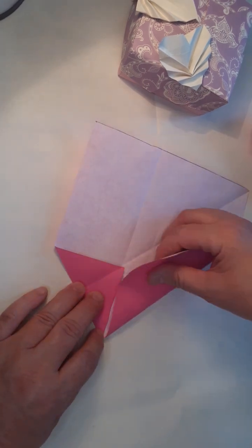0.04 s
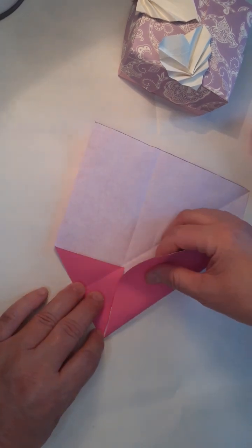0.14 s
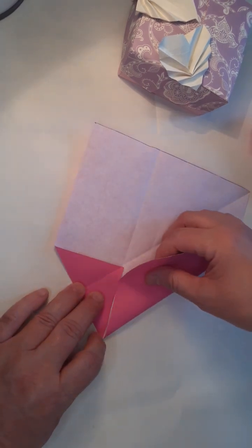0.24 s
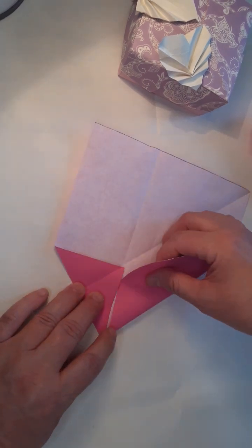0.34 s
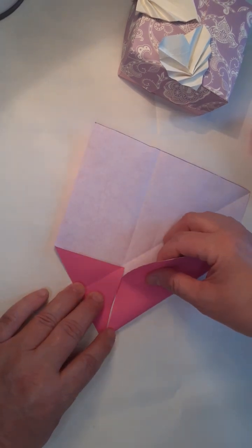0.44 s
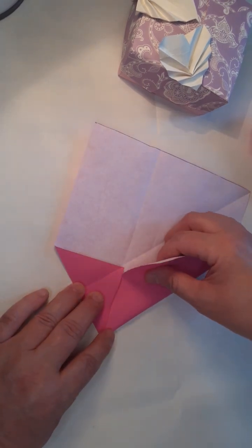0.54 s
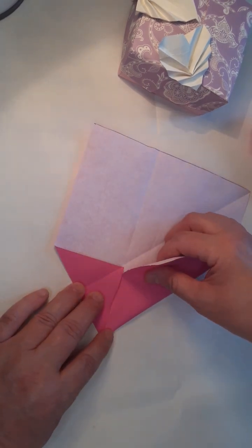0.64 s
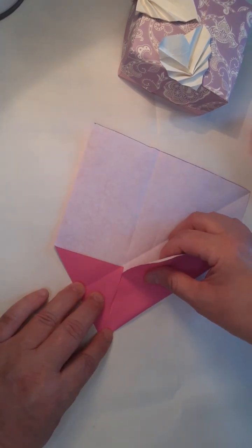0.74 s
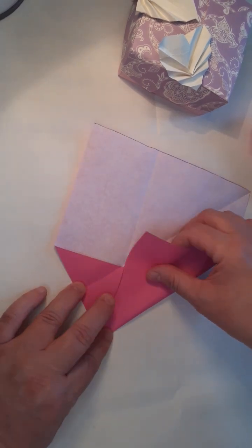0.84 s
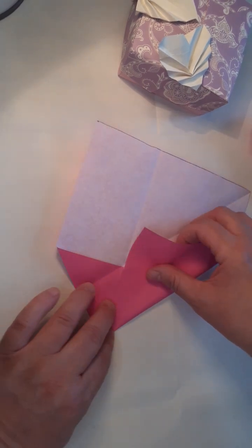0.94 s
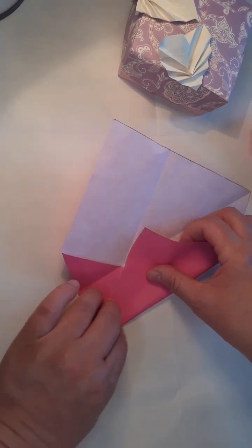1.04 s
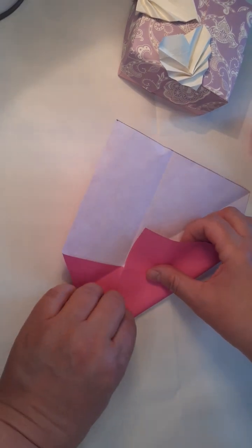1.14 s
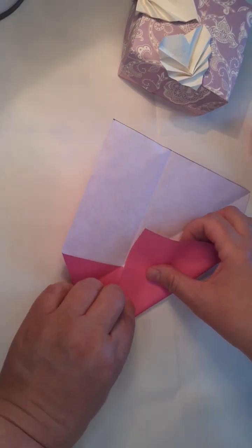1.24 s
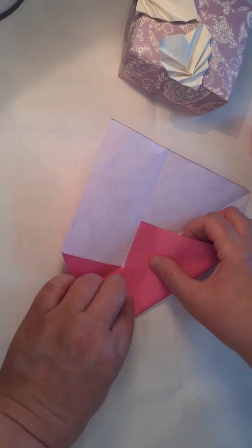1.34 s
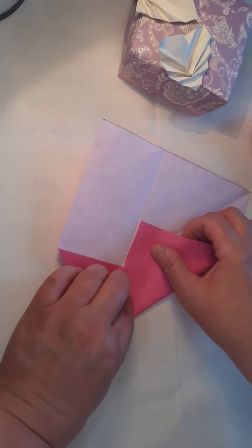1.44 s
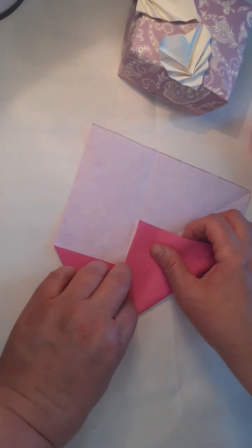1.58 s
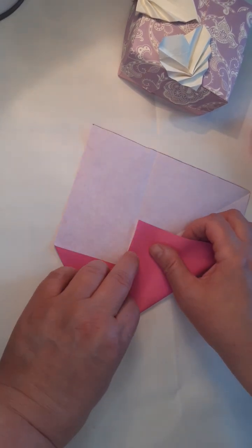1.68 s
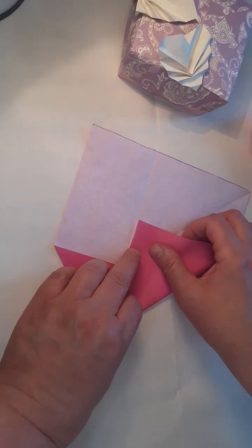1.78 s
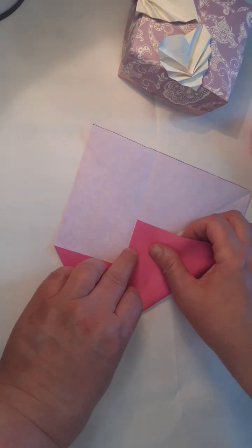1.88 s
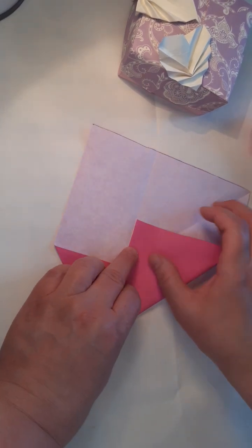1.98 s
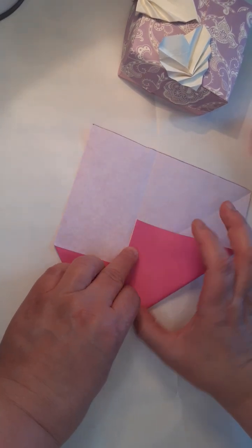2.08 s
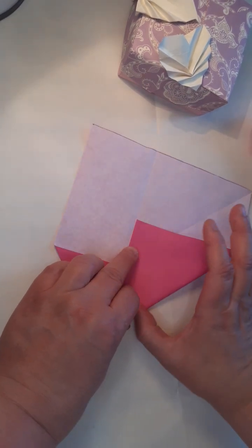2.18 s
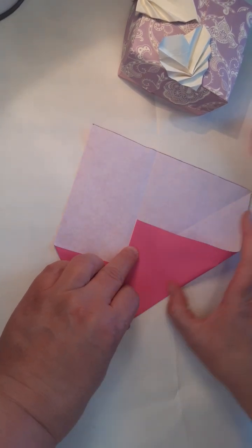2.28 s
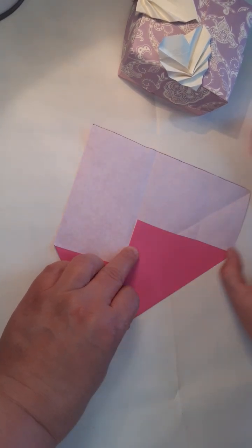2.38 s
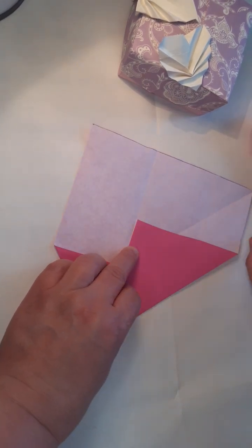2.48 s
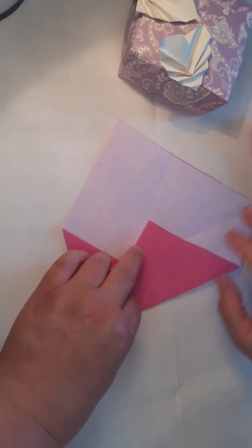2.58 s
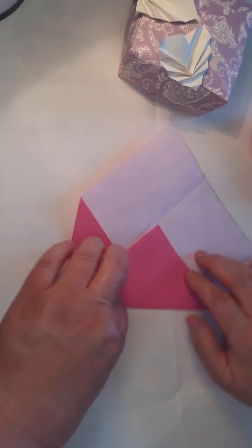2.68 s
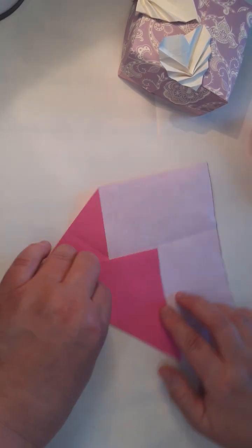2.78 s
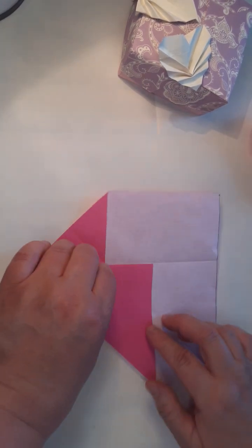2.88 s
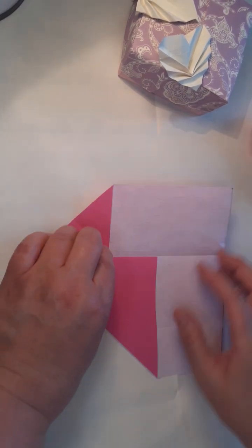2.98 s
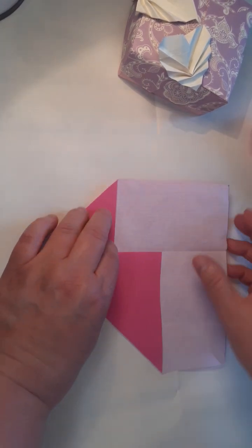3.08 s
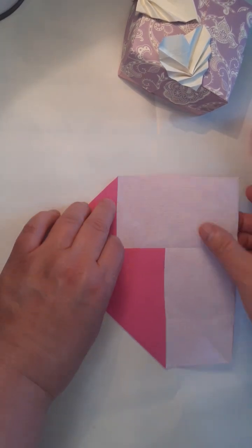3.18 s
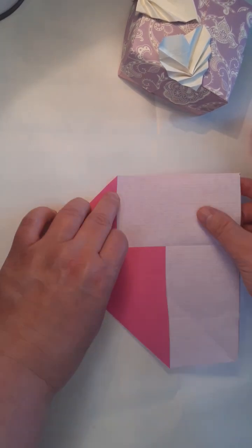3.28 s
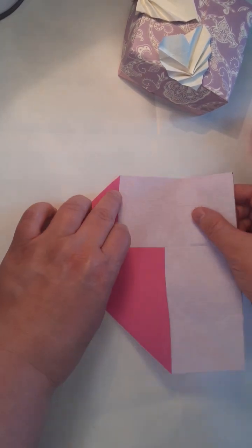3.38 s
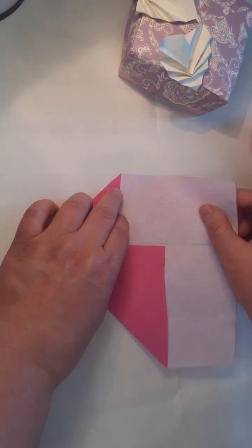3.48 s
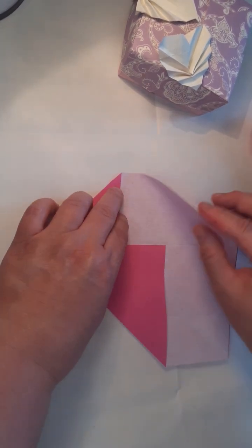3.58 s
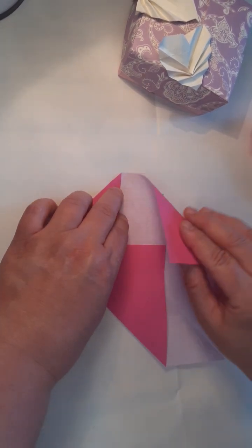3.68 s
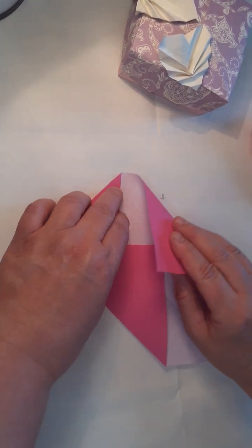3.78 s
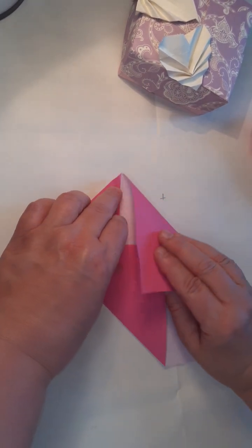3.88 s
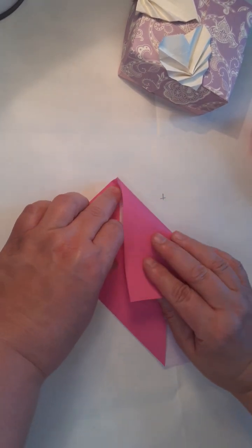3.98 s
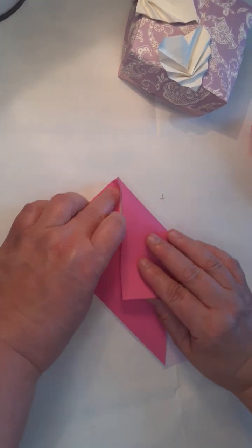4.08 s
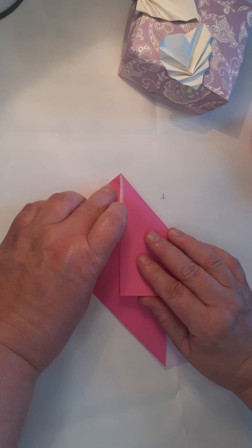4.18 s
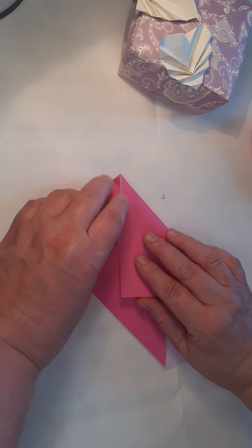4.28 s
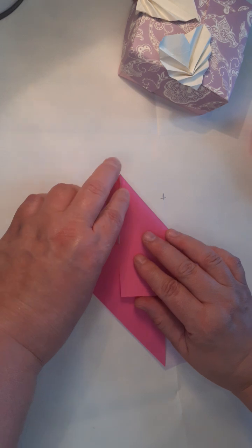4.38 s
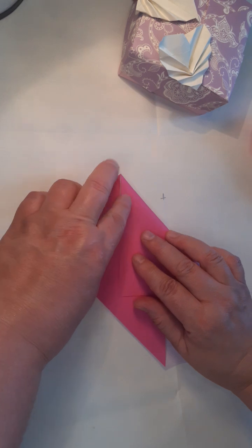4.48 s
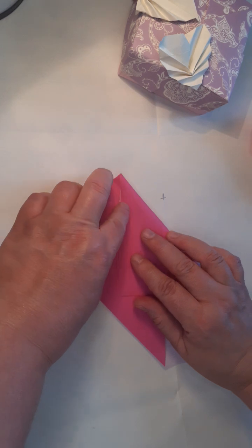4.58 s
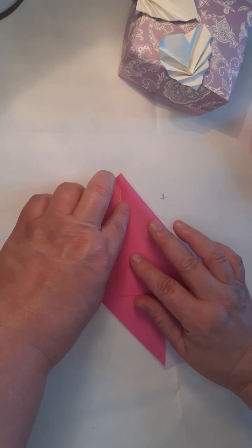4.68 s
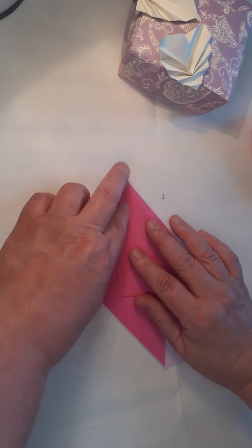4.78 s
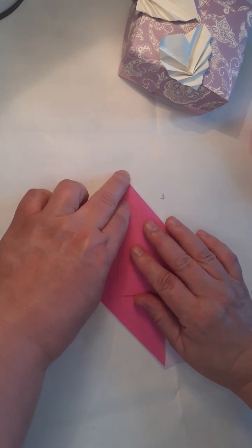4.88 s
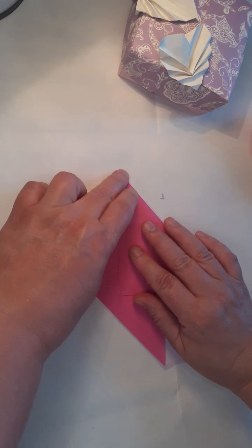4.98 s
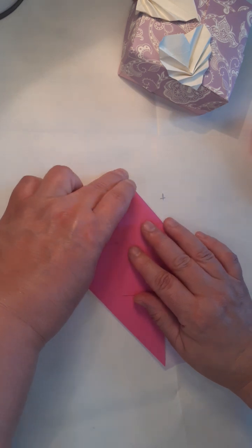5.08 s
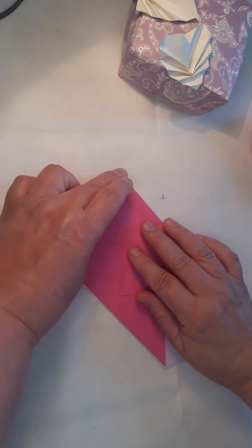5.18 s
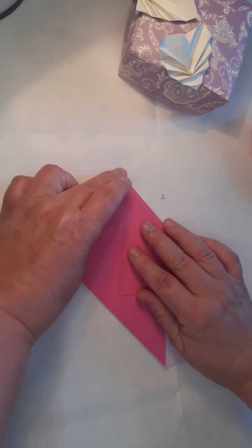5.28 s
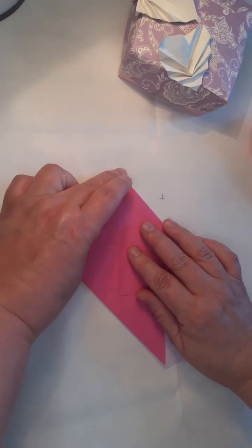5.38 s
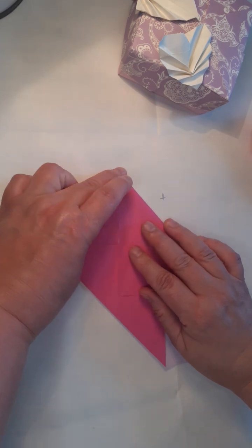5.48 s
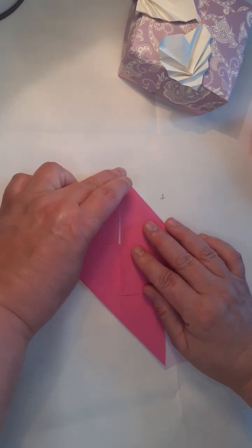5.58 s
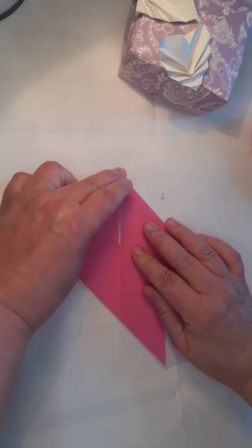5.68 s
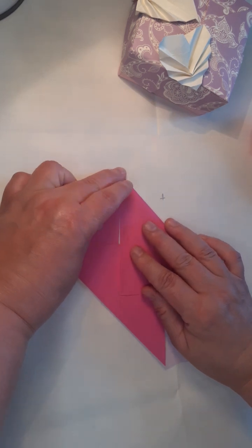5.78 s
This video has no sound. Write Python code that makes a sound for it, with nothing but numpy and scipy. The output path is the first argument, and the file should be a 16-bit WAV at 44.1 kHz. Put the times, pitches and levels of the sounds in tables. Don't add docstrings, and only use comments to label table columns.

```python
import sys
import numpy as np
from scipy import signal
from scipy.fft import rfft, irfft
from scipy.io import wavfile

SR = 44100
rng = np.random.default_rng(int(sys.argv[2]) if len(sys.argv) > 2 else 0)


def voltage_ratio(decibels):
    exponent = np.asarray(decibels, float) / 20
    return 10 ** exponent


def to_wav(sig):
    pcm = np.clip(np.atleast_2d(sig), -1, 1) * 32767
    pcm = np.round(pcm).astype(np.int16)
    wavfile.write(sys.argv[1], SR, pcm.T)


N = 257569

SNAP_LAG_SAMPLES, SLIDE_LAG_SAMPLES = 5.44, 2.82


def band(x, low_hz, high_hz, order=2):
    return signal.sosfilt(signal.butter(order, [low_hz, high_hz], "band", fs=SR, output="sos"), x)


def rms_one(x):
    return x / np.sqrt(np.mean(x ** 2) + 1e-20)


def peak_one(x):
    return x / np.abs(x).max(axis=1, keepdims=True)


def power_sum(*levels_db):
    return 10 * np.log10(sum(voltage_ratio(2 * db) for db in levels_db) + 1e-14)


def in_time(rows):
    s, *columns = np.transpose(rows)
    return [np.interp(np.arange(N) / SR, s, c) for c in columns]


def at_hz(points, hz):
    points = np.array(points)
    return np.interp(np.log(hz), np.log(points[:, 0]), points[:, 1])


def drift(rate_hz):
    r = np.exp(-40 * np.pi * rate_hz / SR)
    slow = signal.lfilter([1], [1, -2 * r, r * r], rng.standard_normal(N // 20 + 2002))[2000:]
    return np.interp(np.arange(N) / 20, np.arange(len(slow)), rms_one(slow))


def resonance(x, hz, width_hz):
    r = np.exp(-np.pi * width_hz / SR)
    poles = [1, -2 * r * np.cos(2 * np.pi * hz / SR), r * r]
    return signal.lfilter([(1 - r * r) / 2, 0, (r * r - 1) / 2], poles, x)


def pair(mid, side, alike):
    alike = np.clip(alike, 0, 1)
    both = np.sqrt(1 + alike) * mid + np.sqrt(1 - alike) * side * [[1], [-1]]
    return both / np.sqrt(1 + alike)


def place(x, pan_db, lag_samples):
    delay = np.exp(-2j * np.pi * np.fft.rfftfreq(x.shape[1]) * lag_samples)
    late = np.array([x[0], irfft(rfft(x[1]) * delay, x.shape[1])])
    return late * voltage_ratio(np.array([pan_db / 2, -pan_db / 2]).reshape(2, -1))


# (frequency [Hz], density [dB per Hz])
FLOOR_SPECTRUM = [(18, -54.5), (30, -20), (106, 2), (252, 2), (345, -3.5), (486, -18.5), (584, -12.5),
                  (1100, -18), (4300, -26), (8740, -24), (16000, -13)]


def floor():
    hz = np.maximum(np.fft.rfftfreq(N, 1 / SR), 20)
    noise = irfft(rfft(rng.standard_normal((2, N))) * voltage_ratio(at_hz(FLOOR_SPECTRUM, hz)), N)
    return voltage_ratio(-73.5) * rms_one(noise)


def room(x):
    t60_s, gap_s, onset_s, level_db, wall_cut_hz = 0.23, 0.0083, 0.0049, -17, 7000
    t = np.arange(SR // 2) / SR
    tail = rng.standard_normal((2, len(t))) * voltage_ratio(-60 * t / t60_s) * np.clip((t - gap_s) / onset_s, 0, 1)
    tail = band(tail, 500, wall_cut_hz, order=1)
    tail = tail / np.sqrt(np.sum(tail ** 2, axis=1, keepdims=True))
    return voltage_ratio(level_db) * signal.fftconvolve(x, tail, axes=1)[:, :N]


# (time [s], rumble [dB], upper mode share [dB])
PRESS = [(0, -70.5, -3), (.67, -67, -10), (1.05, -62, 2), (1.63, -71, -16.5), (1.77, -64, 5.5),
         (2.04, -60.5, -2), (2.09, -49.5, -9), (2.29, -55, -6.5), (2.36, -47.5, 5), (2.48, -43, -7.5),
         (2.55, -62.5, -5), (2.86, -64, 6), (3.64, -58.5, -14.5), (3.9, -69, 2.5), (4.7, -57.5, 1.5),
         (4.91, -71, -13), (5.24, -58.5, -1), (5.84, -57.5, -8)]
# (time [s], left-right [dB])
TABLE_SIDE = [(0.0, -10), (0.08, -15), (2.55, -5.5), (3.04, -12), (3.5, -6.5), (4.05, -10.5), (5.77, -10),
              (5.84, -6.5)]
# (frequency [Hz], width [Hz], level [dB])
TABLE_LOW = [(114, 42, -5.5), (186.7, 20, -3.5), (241.8, 20, 0), (320, 95, -1), (446, 120, -7.5)]
# (frequency [Hz], width [Hz], level [dB])
TABLE_UPPER = [(514, 140, -0.5), (610, 110, 5), (881, 170, -10)]
# (frequency [Hz], likeness [0-1])
LIKENESS = [(200, 1), (600, 0.11), (1400, 0.049), (3000, 0.23), (7000, 0.075), (12000, 0.054)]


def table(rough_db):
    (lean_db, upper_db), (pan_db,) = in_time(PRESS), in_time(TABLE_SIDE)
    shake_db = strokes()[0] + 7.5
    rumble_db = power_sum(lean_db, shake_db)
    upper_share_db = power_sum(lean_db + upper_db, shake_db - 5.5) - rumble_db
    out = 0
    for modes, share_db in ((TABLE_LOW, 0), (TABLE_UPPER, upper_share_db)):
        push = pair(*rng.standard_normal((2, N)), at_hz(LIKENESS, modes[1][0]))
        body = 0
        for k, (hz, width_hz, db) in enumerate(modes):
            body = body + (-1) ** k * voltage_ratio(db + 1.5 * drift(3.0)) * resonance(push, hz, width_hz)
        out = out + rms_one(band(body, 75, 930)) * voltage_ratio(share_db + rough_db * drift(31))
    return out * voltage_ratio(rumble_db - 6.5 + np.array([pan_db, -pan_db]) / 2)


# (time [s], peak [dB], frequency [Hz])
KNOCKS = [(0.805, -36.5, 343), (0.834, -39, 405), (1.21, -35, 289), (2.055, -48.5, 210),
          (2.076, -49.5, 196), (2.095, -56, 320), (2.112, -45, 108), (2.141, -48.5, 107),
          (2.202, -34.5, 304), (2.731, -40.5, 116), (3.059, -43.5, 320), (3.231, -55, 287),
          (3.394, -30.5, 398), (3.5075, -39.5, 600), (3.531, -37.5, 352.4), (3.621, -39, 280),
          (3.682, -32.5, 293), (3.894, -37, 343), (4.202, -33.5, 320), (4.602, -58, 326)]


def knocks(cycles):
    out, t = np.zeros(N + 2048), np.arange(2048) / SR
    for s, peak_db, hz in KNOCKS:
        i = round((s + .001) * SR)
        swell = t * hz * np.exp(-t * hz / cycles)
        out[i:i + 2048] += voltage_ratio(peak_db + 6.0) * np.sin(2 * np.pi * hz * t) * swell
    return band(out[:N], 60, 4000) * voltage_ratio(np.array([[-2.5], [2.5]]))


# (time [s], pitch [Hz], level [dB])
DRAG = [
    (2.31, 217.8, -73),
    (2.345, 230.5, -46.5),
    (2.37, 259, -52),
    (2.395, 291.5, -45),
    (2.415, 311, -56),
    (2.44, 303.8, -38.5),
    (2.475, 319, -43),
    (2.5, 319.6, -51),
    (2.53, 313.5, -67),
]


def drag(wobble_hz, rough_db):
    hz, level_db = in_time(DRAG)
    phase = 2 * np.pi * np.cumsum(hz + wobble_hz * drift(40.1)) / SR
    tone = np.sqrt(2) * (np.sin(phase) + voltage_ratio(-19.0) * np.sin(2 * phase))
    return tone * voltage_ratio(level_db + rough_db * drift(45) + np.array([[-3.0], [2.2]]))


# (time [s], level [dB])
TURN = [
    (2.68, -83),
    (2.73, -49.5),
    (2.76, -39),
    (2.782, -38.5),
    (2.83, -33.5),
    (2.868, -37),
    (2.9, -40),
    (2.93, -47.5),
    (2.965, -87),
]
# (frequency [Hz], width [Hz], level [dB])
TURN_BANDS = [(4930, 1200, -10.5), (6650, 900, -1.5), (8700, 1300, 0.5), (10400, 3200, -1),
              (12600, 5800, 3), (15400, 350, -1)]


def turn():
    noise = pair(*rng.standard_normal((2, N)), 0.14)
    bands = 0
    for k, (hz, width_hz, db) in enumerate(TURN_BANDS):
        bands = bands + (-1) ** k * voltage_ratio(db) * resonance(noise, hz, width_hz)
    level_db, = in_time(TURN)
    swish = rms_one(band(bands, 2399, 18000)) * voltage_ratio(level_db + 0.9 * drift(25))
    return place(swish, 0.3, SLIDE_LAG_SAMPLES)


# (time [s], pitch [Hz], share [dB], looseness [dB], second mode [dB])
POCKET = [(0, 3570, -8, -7.5, -18), (.17, 3358, -4.5, -11.5, -13.5), (.53, 3416, 3.5, -16, -18),
          (.7, 3415, -28.5, -2, -13), (1.2, 4050, -7, -1.5, -7), (1.66, 2205, -15, -4.5, -5),
          (1.73, 2139, 0.5, -7, -0.5), (1.94, 2178, -5.5, -5, -3), (2.02, 2920, -21, -5.5, -4.5),
          (2.45, 2984, -19, 3.5, -5.5), (2.58, 2895, -9, -3.5, -9), (2.95, 2612, -8, -5, -8.5),
          (3.2, 2410, -8.5, 0.5, -8.5), (3.38, 1520, -4, -1, -12), (3.49, 1529, -7.5, -2.5, -13),
          (3.54, 2402, -8, 0.5, -6), (4.15, 2211, -9, 2.5, -3), (4.32, 2184, -5.5, 7.5, 3),
          (4.55, 2204, -7.5, -3.5, 3.5), (4.63, 2288, -13.5, 4.5, 0), (4.93, 2354, -5.5, -1.5, -3),
          (5.0, 3327, -3.5, 10, 7), (5.84, 3266, -10.5, 1, 8)]


def pocket_loss():
    return 10 * np.log10(np.clip(1 - voltage_ratio(2 * in_time(POCKET)[1]) * 2.5, .1, 1))


# (time of top [s], level [dB], brightness [dB],
# swell [ms per 20 dB], fade [ms per 20 dB])
RUBS = [(0.068, -60, 3, 54, 33), (0.188, -60.5, -5, 13, 80), (0.307, -57.5, -4.5, 134, 15),
        (0.499, -50.5, -1.5, 44, 60.5), (0.675, -85, -4, 270, 107), (0.811, -67, 6.5, 71, 72.5),
        (0.99, -68.5, -1, 90, 186), (1.076, -60, 9, 8, 31), (1.423, -60.5, 4, 124, 66),
        (1.692, -68, 3.5, 23, 21), (1.836, -72, -11, 253, 744), (2.007, -59.5, 5, 37.5, 67),
        (2.143, -64, 12.5, 12, 40), (2.407, -47.5, 4, 152, 76), (2.636, -58, 6, 42, 367),
        (2.8, -53, 6, 146, 141), (2.875, -51.5, 14.5, 120, 42), (2.93, -58.5, -2, 80, 14.5),
        (3.015, -56, 3.5, 20, 241), (4.462, -63.5, 4.5, 23, 21), (3.352, -61, -10, 8, 29.5),
        (4.099, -60, 2, 37.5, 73), (4.462, -70, -1, 206.5, 339), (4.624, -63, 2, 67, 58),
        (4.787, -72.5, 4, 50.5, 23), (5.385, -90, 8.5, 46.5, 50.5), (4.93, -68, 3, 20, 20),
        (5.504, -86, 3, 559, 503), (5.594, -70, -2.5, 98, 83)]
# (time of top [s], level [dB], brightness [dB], fade [ms per 20 dB])
SETTLES = [(0.28, -74, -3, 19.5), (0.373, -61, -5.5, 75), (0.816, -55, 2.5, 179), (1.24, -54, 5, 63),
           (1.335, -57.5, -0.5, 152), (1.604, -88, 22, 175), (1.925, -91, 25, 78), (2.305, -53.5, 0, 171),
           (3.23, -51, -1.5, 69.5), (3.382, -52.5, -5.5, 180), (3.513, -51, 2, 91),
           (3.595, -54.5, -6.5, 100), (3.708, -56.5, -1.5, 89), (3.91, -57, -7.5, 79),
           (3.949, -66.5, 2, 222), (4.2, -56, -2, 96), (4.395, -73, -23, 45), (4.936, -71.5, 0, 79.5),
           (5.015, -79, 7.5, 110.5), (5.135, -83.5, 7, 232)]
REGION_DB = [-4.5, 1, -1.7, -2.5]
BRIGHT_SHARE = [-0.37, 0, 0.89, 1.0]
POCKET_SHADE = [0.59, 0, 0.13, 1]


def strokes():
    settle_swell_ms, round_top = 35, 0.34
    region_db, bright_share, shade = (np.reshape(v, (4, 1)) for v in (REGION_DB, BRIGHT_SHARE, POCKET_SHADE))
    t, power = np.arange(0, N + 64, 64) / SR, 1e-12
    rows = list(RUBS) + [(s, db, bright_db, settle_swell_ms, fade) for s, db, bright_db, fade in SETTLES]
    for s, db, bright_db, swell_ms, fade_ms in rows:
        away = 1000 * np.maximum((s - t) / max(swell_ms, 10), (t - s) / max(fade_ms, 10))
        shape_db = db - 20 * (np.hypot(away, round_top) - round_top)
        power = power + voltage_ratio(2 * (shape_db + region_db + bright_db * bright_share))
    levels_db = np.array([np.interp(np.arange(N) / SR, t, db) for db in 10 * np.log10(power)])
    levels_db[0] += in_time(POCKET)[2]
    return levels_db + pocket_loss() * shade


# (low edge [Hz], high edge [Hz])
REGIONS = [(900, 1900), (1900, 4500), (4500, 9500), (9500, 16500)]
TREBLE_LEAN_DB = [0.081, .1, 1.6, 1.1]
# (time [s], left-right [dB])
SIDE = [(0.0, -1), (3.81, 0), (3.89, -3), (3.94, -1), (4.63, -3.5), (4.65, -1.5), (5.56, -5), (5.84, -7)]


def rustle(grains_per_s, crumple, patchy_db, pocket_width_hz):
    flap_db, mid_db, hiss_db, air_db = strokes()
    pocket_hz, pocket_db, _, overtone_db = in_time(POCKET)
    born = rng.random(N) < grains_per_s * voltage_ratio(6.5 * drift(14)) / SR
    sizes = voltage_ratio(3.5 * np.minimum(rng.exponential(1, N), 2.5))
    cracks = rms_one(signal.lfilter(np.hanning(40), [1], born * sizes))
    crumple = np.clip(crumple, 0, 1)
    shake = np.sqrt(1 - crumple + crumple * np.minimum(cracks, 4.5) ** 2)
    mid, side = rng.standard_normal((2, N)) * shake
    levels_db = (flap_db, mid_db + pocket_loss(), hiss_db, air_db)
    out = 0
    for (low, high), level_db, lean_db in zip(REGIONS, levels_db, TREBLE_LEAN_DB):
        alike = at_hz(LIKENESS, np.sqrt(low * high))
        both = rms_one(band(pair(mid, side, alike), low, high, order=3))
        out = out + both * voltage_ratio(level_db + patchy_db * drift(28) + lean_db / 2 * np.array([[-1], [1]]))
    overtone = 2.6
    phase = 2 * np.pi * np.cumsum(pocket_hz) / SR
    slow = rng.standard_normal((2, N)) + 1j * rng.standard_normal((2, N))
    slow = signal.sosfilt(signal.butter(2, pocket_width_hz / 2, fs=SR, output="sos"), slow)
    pace = np.cumsum(np.clip(pocket_hz / 3600, 0, 1) ** 2.0)
    narrow = shake * np.array([np.interp(pace % N, np.arange(N), v) for v in slow])
    wide = shake * np.array([np.interp(overtone * pace % N, np.arange(N), v) for v in slow])
    lower = narrow * np.exp(1j * phase)
    upper = voltage_ratio(overtone_db + 0.83 * drift(7.2)) * wide[::-1] * np.exp(1j * overtone * phase)
    out = out + rms_one((lower + upper).real) * voltage_ratio(mid_db + pocket_db)
    return place(out, *in_time(SIDE), SLIDE_LAG_SAMPLES)


def starve(x):
    gap_share, gap_db, gap_from_hz = .022, -30, 2800
    hz, _, cells = signal.stft(x, SR, nperseg=512)
    dropped = rng.random((len(hz) // 2 + 1, cells.shape[2] // 6 + 1)) < gap_share
    dropped = np.kron(dropped, np.ones((2, 6)))[:len(hz), :cells.shape[2]]
    dropped = dropped * (hz > gap_from_hz)[:, None]
    return signal.istft(cells * voltage_ratio(gap_db * dropped), SR, nperseg=512)[1][:, :N]


# (time [s], peak [dB], frequency [Hz], left-right [dB])
FLAP_PANELS = [(0.806, -48, 619, 3), (1.21, -48, 960, -7.5), (1.339, -44, 1135, -8),
               (2.201, -45, 638, -4.0), (2.269, -46.5, 517, -9), (3.059, -47, 840, -19.5),
               (3.23, -55.5, 830, -2.0), (3.247, -50.5, 835, -3), (3.394, -37, 590, -9.5),
               (3.5075, -36, 612, -4), (3.532, -39, 649, -6.5), (3.682, -41, 813, -19),
               (3.894, -40, 890, -16), (4.124, -48, 538, -10), (4.199, -39, 1028, -5),
               (4.385, -55, 591, -6), (4.619, -49, 545.6, -11)]
# (time [s], peak [dB], frequency [Hz], left-right [dB])
WIDE_PANELS = [(0.8066, -27, 2400, -5), (0.8144, -36.5, 1950, -0.5), (0.836, -49, 1940, 3),
               (1.2109, -32.5, 2470, -3), (1.3404, -32, 2400, -4), (1.4351, -46, 1920, 4),
               (2.0428, -51, 1310, -1.5), (2.2692, -33.5, 1950, -1), (3.2011, -37, 2377, 2),
               (3.2306, -42, 2190, -5), (3.2485, -35, 1850, -4.5), (3.3667, -45, 1640, 2),
               (3.3864, -34, 1550, -0.5), (3.3952, -26, 1530, 3.5), (3.5076, -27, 1550, 0.5),
               (3.5319, -46, 1467, 3), (3.5922, -35, 2170, 2), (3.682, -30.5, 2140, -16),
               (3.8921, -32.5, 2300, -11), (3.9474, -50, 2170, -6), (3.9589, -43, 2220, -5),
               (4.1984, -32.5, 2300, -14), (4.2174, -40.5, 1250, 2), (4.3849, -44, 2510, -10)]
# (time [s], peak [dB], frequency [Hz], left-right [dB])
MIDDLE_PANELS = [(0.2576, -43, 3700, -13), (0.3613, -44, 3330, 13), (0.8076, -22, 3510, -12.5),
                 (0.8144, -41, 3640, -4), (1.1955, -35.5, 3550, -1), (1.2116, -22.5, 4100, -5),
                 (1.3418, -30, 2840, 8), (2.269, -41, 2570, 7), (3.2015, -20, 3120, -1),
                 (3.2184, -40.5, 3210, 6), (3.2309, -40, 2780, 3), (3.3978, -35, 2660, 12),
                 (3.3944, -28, 3270, -3), (3.5077, -28, 3130, 1), (3.684, -26, 3440, 13),
                 (3.8928, -36.5, 3550, 24), (4.1946, -40, 2570, -6), (4.386, -46, 2853, -5),
                 (4.6111, -54, 5160, -10.0), (4.6115, -38, 4705, -16), (4.9348, -55, 2700, -14)]
# (time [s], peak [dB], frequency [Hz], left-right [dB])
MORE_MIDDLE_PANELS = [
    (4.2, -31.5, 3440, -14),
    (3.3, -52, 2700, 1),
    (3.477, -46, 3200, 1.5),
    (4.3845, -49.5, 1320, -1),
    (4.3845, -47, 4100, -3),
    (4.62, -48, 2450, -3),
    (1.401, -44, 1800, -1),
    (2.4, -38, 10800, 0),
    (1.38, -45, 5200, 2),
]
# (time [s], peak [dB], frequency [Hz], left-right [dB])
SECOND_PANELS = [(0.8071, -29, 5750, -8), (1.2116, -19, 5470, 4), (1.3411, -35, 3830, -4),
                 (2.2692, -39, 4640, -5), (2.367, -37, 4570, -8), (3.2306, -40.5, 5490, -21),
                 (3.3952, -25.5, 4570, -8.5), (3.5077, -26.5, 4920, 10.5), (3.6004, -53, 4590, -4.5),
                 (3.6842, -24.5, 4040, -4), (3.8935, -39.5, 4740, -15.5), (4.2014, -31, 4280, -3)]
# (time [s], peak [dB], frequency [Hz], left-right [dB])
SMALL_PANELS = [(0.2029, -44, 7370, -9), (0.8069, -19.5, 5740, -12.5), (0.8362, -34, 6100, -5.5),
                (1.1952, -38.5, 8490, -5.5), (1.2116, -15.5, 7420, -5), (1.939, -41, 12000, 10),
                (2.1344, -43, 11300, 4), (2.1999, -41, 5300, 2), (2.2692, -30, 8230, -0.5),
                (2.7297, -30, 12600, 4), (2.8688, -24, 12680, 0), (3.2024, -29, 8600, -5),
                (3.2302, -38, 5400, -8), (3.3944, -33, 5200, -3.5), (3.5079, -27.5, 9000, 2),
                (3.683, -19, 5130, 4)]
PANEL_LAG_SAMPLES = [1.2, 2.5, 4.2, 4.1, 5.1]


def panels():
    rise = 0.58
    groups = (FLAP_PANELS, WIDE_PANELS, list(MIDDLE_PANELS) + list(MORE_MIDDLE_PANELS), SECOND_PANELS, SMALL_PANELS)
    rings = ((1.5, -5), (1.8, -3), (2.9, -6.5), (8.2, -5), (6.3, -6.5))   # (length [cycles], trim [dB])
    out, t = np.zeros((2, N + 1024)), np.arange(1024) / SR
    for rows, (cycles, trim_db), lag in zip(groups, rings, PANEL_LAG_SAMPLES):
        for s, peak_db, hz, pan_db in rows:
            u = t * hz / cycles
            ring = (u / rise) ** rise * np.exp(rise - u) * np.sin(2 * np.pi * hz * t)
            i = round(s * SR)
            out[:, i:i + 1024] += voltage_ratio(peak_db + trim_db) * place(np.array([ring, ring]), pan_db, lag)
    return out[:, :N]


# (time [s], peak [dB],
# frequency [Hz])
FLICKS = [(0.1775, -51.5, 7060), (0.1908, -55, 6500), (0.283, -50, 8000), (0.421, -59, 5000),
          (0.472, -50, 8000), (5.012, -58, 9000), (0.565, -55.5, 7500), (2.057, -47, 10000),
          (2.131, -51, 11000), (2.975, -50.5, 1900), (4.033, -52.5, 4960), (3.2165, -36, 2490)]


def flicks():
    edge_db, ms, flap_db = -10, 1.9, -26
    rows = [(s, db, hz, edge_db, ms, flap_db) for s, db, hz in FLICKS]
    return snaps(rows, panel_q=2.0, broad_db=-1.0)


# (time [s], peak [dB], panel [Hz], edge share [dB], length [ms])
SNAPS = [(0.201, -46, 6850, -8, 7.8), (0.7628, -45.5, 3730, -3.5, 13), (0.8076, -17, 4130, 6, 1.1),
         (0.8152, -33.5, 2900, -11.5, 4), (0.8344, -31, 2260, 0, 2.9), (1.21135, -12, 6000, -1.5, 1.2),
         (1.3401, -31.5, 2400, -40, 2.5), (2.27, -26, 3330, -20, 1.2), (2.4562, -33.5, 1600, 10, 2.2),
         (2.728, -31.5, 8000, -9, 5.2), (2.8684, -32.5, 8700, 10, 2.8), (3.059, -37, 3335, -14, 2.8),
         (3.202, -23.5, 3040, 0, 0.89), (3.23, -28.5, 2500, -0.5, 3.4), (3.2482, -34, 2330, -18, 1.2),
         (3.3874, -36, 1706, -15, 1.6), (3.3933, -22, 1760, -13.5, 1.9), (3.5075, -20, 3300, -2, 1.94),
         (3.5331, -34.5, 1973, -18.5, 1.4), (3.5899, -41.5, 2200, -30.5, 2.5),
         (3.682, -21.5, 2330, -5, 2.5), (3.8927, -37.5, 2900, -39, 3.5), (4.1988, -28, 2467, -1.5, 4.2),
         (4.612, -44.5, 4640, -5, 3.6)]
# (time [s], peak [dB], panel [Hz], edge share [dB])
TICKS = [(2.0752, -54, 9000, 5), (0.2592, -40, 4840, 1.5), (0.3607, -42, 3030, 10),
         (0.455, -49.5, 3273, -7), (0.9555, -40.5, 6040, -9.5), (0.9923, -45, 3650, -1),
         (1.118, -49, 2510, -9), (1.195, -48, 8470, -6.5), (1.38, -44.5, 2830, -19), (1.436, -46, 1740, -7),
         (1.5973, -51.5, 8960, 12), (1.677, -57, 2180, -14), (1.9392, -47.5, 2140, 6.5),
         (2.0193, -42, 3620, -8.5), (2.043, -48, 1423, -4), (4.201, -29, 980, -9),
         (2.0945, -45, 7960, -11.5), (2.1992, -47.5, 5200, 2), (3.366, -42, 1830, -14),
         (3.4495, -41, 1553, -25.5), (3.619, -43.5, 2204, -6), (3.9482, -41, 2130, -25),
         (4.11, -42.5, 2310, -6), (4.1241, -45, 2304, -32), (4.3849, -54, 2530, -33),
         (4.467, -45.5, 7500, -8), (1.027, -55, 3970, -2), (4.918, -50, 5630, 2), (4.945, -51, 2683, 0),
         (5.5767, -50.5, 8220, 5)]


def buckles():
    loose_db = in_time(POCKET)[2]
    rows = []
    for s, db, hz, edge_db, ms in SNAPS:
        flap_db = -16 + loose_db[round(s * SR)] - 8.5 * np.log2(hz / 2200)
        flap_db -= 0.88 * (db + 32.5)
        rows.append((s, db, hz, edge_db, ms, flap_db))
    for s, db, hz, edge_db in TICKS:
        rows.append((s, db, hz, edge_db, 2.1, -26 - 0.7 * edge_db))
    return rows


def snaps(rows, panel_q, broad_db):
    out, t = np.zeros((2, N + 1024)), np.arange(1024) / SR
    pan_db, = in_time(SIDE)
    for s, peak_db, hz, edge_db, ms, flap_db in rows:
        u = t / (max(ms, .4) * 0.0018)
        cracks = pair(*rng.standard_normal((2, 1024)), 0.16)
        burst = cracks * u ** 0.29 * np.exp(-1.6 * u)
        width_hz = hz / panel_q * (1 + (hz / 6000) ** 2)
        panel = peak_one(resonance(burst, hz, width_hz))
        crack_db = broad_db + 0.26 * min(edge_db, 0)
        body = peak_one(panel + voltage_ratio(crack_db) * peak_one(band(burst, 2200, 7400)))
        both = peak_one(body + voltage_ratio(edge_db) * peak_one(band(burst, 5000, 16000)))
        flap = peak_one(band(cracks * u * np.exp(-.9 * u), 550, 1300))
        i = round(s * SR)
        snap = place(both + voltage_ratio(flap_db) * flap, pan_db[i], SNAP_LAG_SAMPLES)
        out[:, i:i + 1024] += voltage_ratio(peak_db + 2.0) * snap
    return out[:, :N]


def scene():
    cracks = snaps(buckles(), panel_q=3.9, broad_db=-4.5)
    blows, rings = knocks(cycles=0.66), panels()
    sheet = rustle(grains_per_s=240, crumple=.17, patchy_db=1.95, pocket_width_hz=780)
    echo = room(voltage_ratio(0.5) * cracks + blows + voltage_ratio(-3) * rings)
    steady = echo + sheet + table(rough_db=2.0) + floor() + turn() + drag(wobble_hz=23.66, rough_db=0.5)
    steady = starve(signal.sosfilt(signal.cheby2(14, 50, 16200, fs=SR, output="sos"), steady))
    return cracks + blows + rings + flicks() + steady


def top_cut(x):
    return signal.sosfilt(signal.butter(12, 16980, fs=SR, output="sos"), x)


def record(dry):
    thin = signal.sosfilt(signal.butter(2, 9.9, "high", fs=SR, output="sos"), dry)
    mix = signal.sosfilt(signal.cheby2(10, 60, 17100, fs=SR, output="sos"), thin)
    return top_cut(mix)


dry = scene()
out = record(dry)
to_wav(out)
```